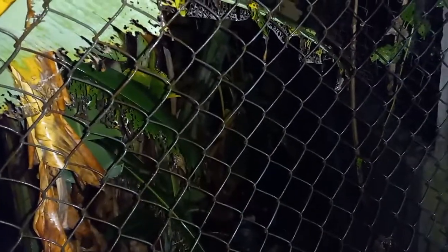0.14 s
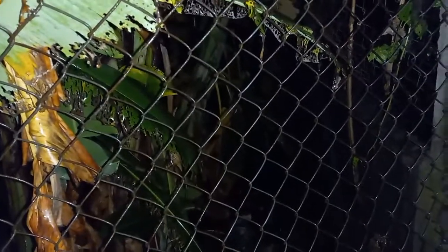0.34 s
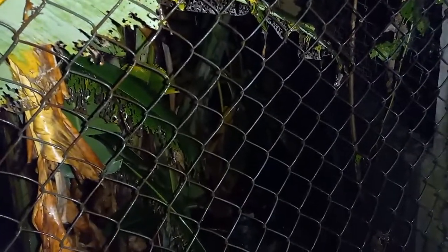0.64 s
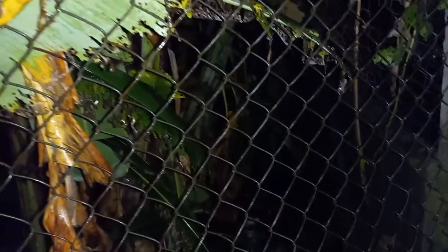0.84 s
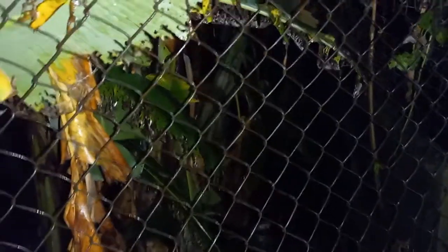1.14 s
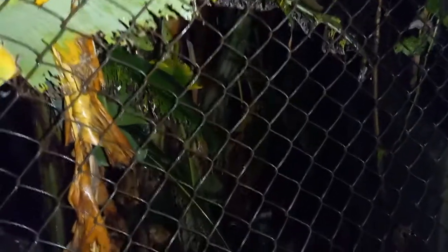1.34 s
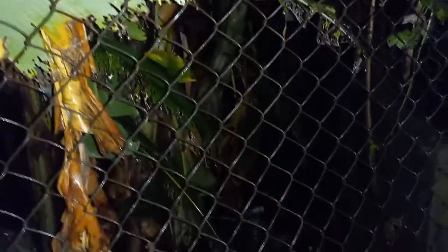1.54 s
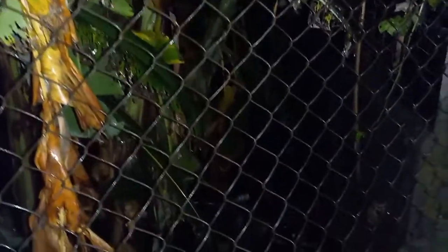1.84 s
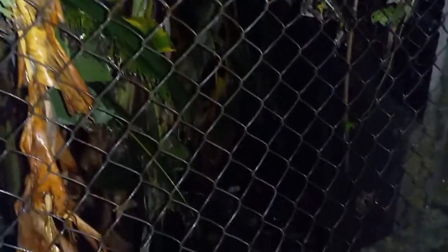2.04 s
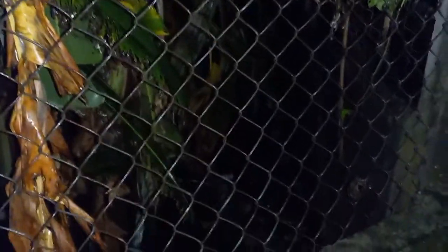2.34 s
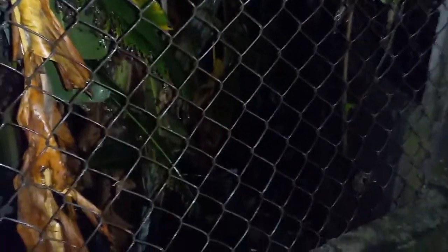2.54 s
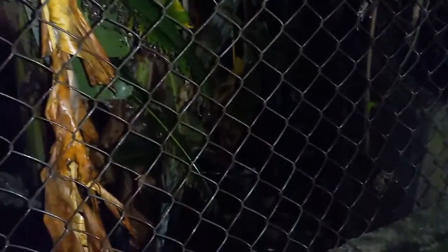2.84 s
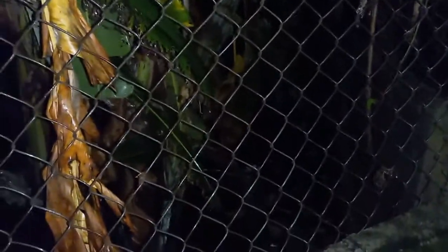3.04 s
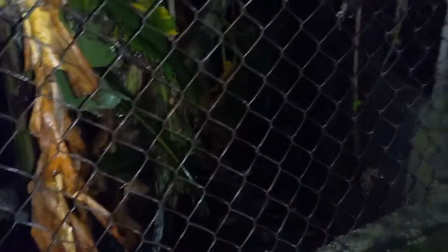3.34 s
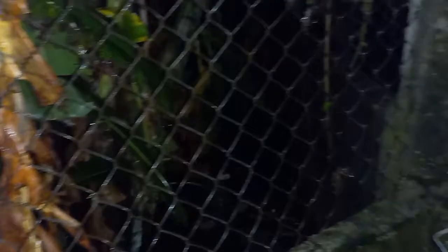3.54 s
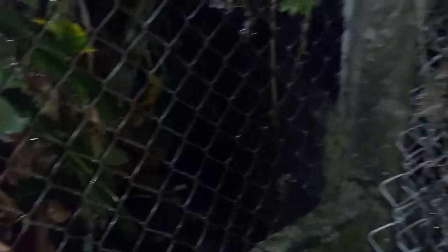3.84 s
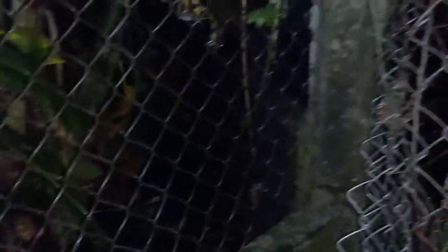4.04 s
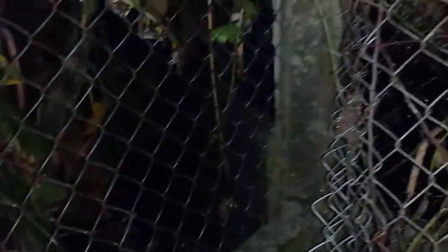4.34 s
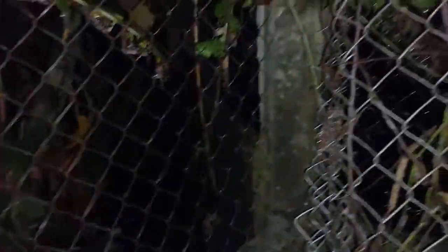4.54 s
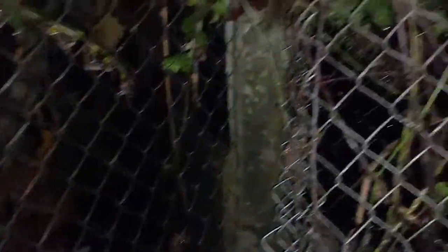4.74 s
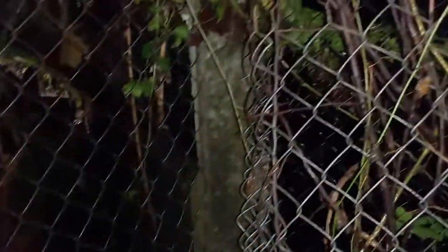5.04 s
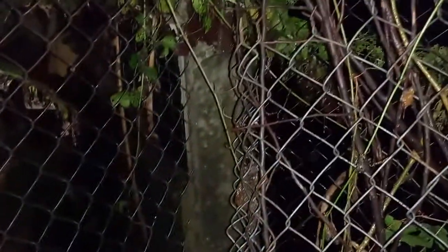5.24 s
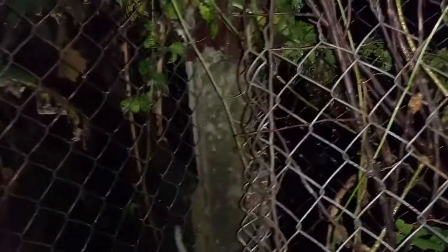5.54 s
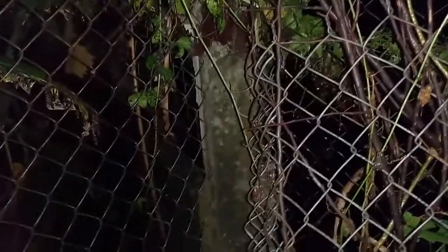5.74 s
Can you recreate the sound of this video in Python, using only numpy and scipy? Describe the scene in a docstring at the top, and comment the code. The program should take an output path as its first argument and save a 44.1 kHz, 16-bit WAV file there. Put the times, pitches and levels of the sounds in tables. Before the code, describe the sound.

Small frogs rattle, buzz and trill in a dense night chorus over shrill insects, with low hoots and one loud close moo.

```python
"""A wet garden at night, heard by a stereo pair of microphones among the leaves.
Small frogs rattle, buzz and trill in the undergrowth: uneven pulse trains ring throat and vocal sac.
One large frog moos close by in harmonics of one pitch; others hoot far off in wavering single tones.
Crickets, a katydid and an insect choir shrill above in shaped noise and pulses; single sharp ticks
stand out as damped rings, over a low distant rumble of coloured noise."""
import sys
import numpy as np
from scipy import signal
from scipy.fft import rfft, irfft
from scipy.io import wavfile

SR = 44100
rng = np.random.default_rng(int(sys.argv[2]) if len(sys.argv) > 2 else 0)


def transcribe(signal):
    """Save signal, clipped to [-1, 1], as a 16-bit WAV file at the path in sys.argv[1]."""
    frames = np.atleast_2d(signal).T
    limited = np.clip(frames, -1, 1)
    pcm = np.round(limited * 32767).astype(np.int16)
    wavfile.write(sys.argv[1], SR, pcm)


N = 259308
TIME = np.arange(N) / SR


def from_db(db):
    """Decibels to gain."""
    return 10 ** (np.asarray(db) / 20)


def rms_one(x):
    """Scale to unit power."""
    return x / np.sqrt(np.mean(x ** 2) + 1e-20)


def in_time(rows):
    """Each column of a curve at every sample."""
    s, *columns = np.transpose(rows)
    return [np.interp(TIME, s, c) for c in columns]


def at_hz(points):
    """A table over frequency at every spectral bin, joined along log frequency."""
    hz, value = np.transpose(points)
    return np.interp(np.log(np.fft.rfftfreq(N, 1 / SR) + 1), np.log(hz), value)


def coloured(x, spectrum):
    """Weight a sound by a spectrum of (frequency [Hz], level [dB]); unit power."""
    return rms_one(irfft(rfft(x) * from_db(at_hz(spectrum)), N))


def stereo_noise():
    """Unrelated white noise at the left and right microphones."""
    return rng.standard_normal((2, N))


def panned(db):
    """Left and right gains for a left-right level difference in dB."""
    return from_db(np.array([[.5], [-.5]]) * db)


def drift(rate):
    """Slow random wandering with a spread of 1, from 2 * rate random points per second."""
    knots = rng.standard_normal(int(2 * rate * N / SR) + 2)
    return rms_one(np.interp(TIME * 2 * rate, np.arange(len(knots)), knots))


# how alike the two microphones hear a wide source: (frequency [Hz], left-right correlation [-1 to 1])
MICROPHONE_LIKENESS = [(30, 0.53), (100, 0.76), (240, 0.73), (600, 0.21), (1300, -0.86), (2200, 0.17),
                       (3300, -0.034), (16000, 0.0053)]


def diffuse(pair):
    """Two unrelated signals become one wide sound field, alike in the bass."""
    mid, side = rfft(pair)
    alike = np.clip(at_hz(MICROPHONE_LIKENESS), -1, 1)
    return irfft(np.sqrt(1 + alike) * mid + np.sqrt(1 - alike) * side * [[1], [-1]], N)


def resonate(x, hz, width_hz):
    """A steep-sided resonance whose centre may glide: shift it to zero, smooth twice, shift back."""
    turn = np.exp(2j * np.pi * np.cumsum(hz * np.ones(x.shape[-1])) / SR)
    r = np.exp(-np.pi * width_hz / SR)
    smoothed = signal.lfilter([(1 - r) ** 2], [1, -2 * r, r * r], x / turn + 1e-18)
    return np.real(turn * smoothed)


def pulses(per_s, jitter, uneven_db, first_s=None):
    """A train of slightly uneven clicks, one of them at first_s if that is given."""
    cycles = np.cumsum(per_s * (1 + jitter * drift(15))) / SR
    cycles = cycles + (rng.random() if first_s is None else -np.interp(first_s, TIME, cycles))
    at = np.flatnonzero(np.diff(np.floor(cycles)))
    clicks = np.zeros(N)
    clicks[at] = from_db(uneven_db * rng.standard_normal(len(at)))
    return clicks


def bursts(clicks, t60):
    """Each click arrives as a short stereo puff of noise, smeared by the leaves."""
    decay = signal.lfilter([1], [1, -from_db(-60 / (t60 * SR))], clicks + 1e-18)
    return decay * rng.standard_normal((2, len(clicks)))


def swell(start, end, fullness, lateness=1):
    """One arch, broader with lower fullness; lateness above 1 moves its top towards the end."""
    progress = np.clip((TIME - start) / (end - start), 0, 1)
    return np.sin(np.pi * progress ** lateness).clip(0) ** fullness


def foliage(x, t60, wet_db):
    """The direct sound and a dying scatter from leaves and walls, different on each side."""
    t = np.arange(SR // 4) / SR
    scatter = rng.standard_normal((2, len(t))) * from_db(-60 * t / t60)
    scatter *= from_db(wet_db) / np.sqrt(np.sum(scatter ** 2, axis=1, keepdims=True))
    scatter[:, 0] += 1  # direct path
    return signal.oaconvolve(np.atleast_2d(x), scatter, axes=1)[:, :N] / np.hypot(1, from_db(wet_db))


# how hard the crowd calls, before its gains:
# (time [s], throat level [dB], vocal sac level [dB])
CROWD_EFFORT = [(0.0, -36.5, -33), (0.34, -38, -42.5), (0.65, -36, -35.5), (1.11, -37.5, -41),
                (1.46, -35.5, -39), (1.67, -36, -36), (2.41, -38.5, -39.5), (2.78, -35, -34.5),
                (2.88, -33, -39), (3.06, -35, -32.5), (3.98, -35.5, -40), (4.14, -34.5, -32.5),
                (4.57, -31.5, -33.5), (4.77, -35, -40), (5.24, -36, -34.5), (5.44, -39, -43.5),
                (5.55, -34.5, -35.5), (5.88, -32.5, -31.5)]
# where the crowd leans between the microphones: (time [s], left-right difference [dB])
CROWD_DIRECTION = [(0.0, -2.5), (3.78, 0), (5.5, -4.5)]
# the crowd's two resonance regions: (frequency [Hz], relative level [dB])
CROWD_THROAT = [(900, -54), (1100, -18.5), (1230, -4), (1370, 4), (1600, 0), (2050, -4), (2170, 0.5),
                (2330, -4), (2800, -7), (3300, -29)]
CROWD_SAC = [(2200, -22.5), (2650, -13), (2950, -3.5), (3250, 1.5), (3480, -2), (3700, -8), (3950, -14),
             (4400, -24.5), (5500, -34)]
CROWD_THROAT_GAIN_DB, CROWD_SAC_GAIN_DB = 2, 2.5


def frog_crowd(count=10):
    """Many pulse trains, each waxing and waning, blur into a grainy wash in two resonance regions."""
    throat_db, sac_db = in_time(CROWD_EFFORT)
    clicks = 0
    for slowest, fastest in [(33, 39), (100, 130)] * (count // 2):  # rattlers and buzzers, pulses per s
        train = pulses(rng.uniform(slowest, fastest), .01, 2.5)
        clicks = clicks + train * from_db(3.1 * drift(2.02))
    wash = diffuse(foliage(clicks - clicks.mean(), t60=0.15, wet_db=11.5))
    wash = rms_one(wash) + from_db(-1.5) * stereo_noise()
    throats = from_db(CROWD_THROAT_GAIN_DB + throat_db) * coloured(wash, CROWD_THROAT) * panned(-1.35)
    sacs = from_db(CROWD_SAC_GAIN_DB + sac_db) * coloured(wash, CROWD_SAC) * panned(5.3)
    return panned(in_time(CROWD_DIRECTION)[0]) * (throats + sacs)


# calls of the nearest rattler: (first click [s], end [s], click rate at the start [1/s],
# relative level [dB], left-right difference [dB])
KNOCK_CALLS = [(4.8545, 5.388, 37.2, -23.5, -2), (5.493, 5.7, 37, -28, -1)]
# its body resonances: (frequency [Hz], width [Hz], level at the start [dB],
# level gained as the sac fills [dB/s])
KNOCK_RESONANCES = [(1470, 190, -2.5, -19), (1690, 330, -2.5, -9), (2150, 330, -17, -8),
                    (2830, 360, -5, 14), (3440, 460, -4.5, 20.5), (7200, 2100, -18, 0)]
KNOCK_SLOWING_PER_S2 = 5.2


def knocking_frog():
    """The nearest rattler's clicks stand out sharply, with a short scatter from the leaves;
    they slow a little and brighten as its sac fills."""
    out = np.zeros((2, N))
    for start, end, per_s, db, pan_db in KNOCK_CALLS:
        on = (TIME > start - .5 / per_s) & (TIME < end)
        t = TIME[on] - start
        clicks = pulses(per_s - KNOCK_SLOWING_PER_S2 * (TIME - start), .002, 1.2, start)[on]
        clicks = clicks * swell(start - 2 / per_s, end, 0.45)[on] * from_db(db) * panned(pan_db)
        for hz, width_hz, level_db, gain_db_per_s in KNOCK_RESONANCES:
            unit_peak = np.e * SR / (np.pi * width_hz)  # gives each ring the height of its click
            struck = clicks * from_db(level_db + gain_db_per_s * t)
            out[:, on] += unit_peak * resonate(struck, hz, width_hz)
    return foliage(out, t60=.07, wet_db=-2)


# rattling frogs: (first pulse [s], end [s], pulse rate [1/s], sac resonance at mid-call [Hz],
# relative level [dB], left-right difference [dB])
RATTLE_CALLS = [(.01, 0.158, 42, 3160, -43, 6), (.304, .63, 35.2, 2920, -39.5, 2),
                (.613, 1.099, 35, 3300, -40, 3), (1.595, 2.051, 34, 3280, -38.5, 4),
                (2.049, 2.517, 35.95, 3340, -39.5, 1), (2.526, 2.93, 37.3, 3280, -38.5, 5),
                (3.347, 3.919, 38, 3260, -34, 1.5)]
RATTLE_CLIMB_HZ_PER_S = 350


def rattling_frogs():
    """Slow sharp pulses ring the throat and a sac whose pitch creeps up through the call."""
    puffs, sacs = np.zeros((2, 2, N))
    for start, end, per_s, hz, db, pan_db in RATTLE_CALLS:
        on = (TIME > start - .5 / per_s) & (TIME < end)
        drive = bursts(pulses(per_s, 0.004, .7, start)[on], t60=0.015)
        gain = swell(start - 1 / per_s, end, 0.3)[on] * from_db(db) * panned(pan_db)
        sac_hz = hz + RATTLE_CLIMB_HZ_PER_S * (TIME[on] - (start + end) / 2)
        puffs[:, on] += gain * rms_one(drive)
        sacs[:, on] += gain * rms_one(resonate(drive, sac_hz, 660))
    throat_colour = [(900, -33), (1150, -10), (1400, 7.5), (1800, -3.0), (2100, 6.0), (2500, 1.5),
                     (3700, -5.5), (4300, -39), (5600, -30), (8000, -24), (14000, -28)]
    throats = np.std(puffs) * coloured(puffs, throat_colour)
    return foliage(from_db(-1) * sacs + from_db(-3) * throats, t60=0.11, wet_db=0)


# rising buzzes: (start [s], end [s], first sac resonance [Hz], last sac resonance [Hz],
# relative level [dB], first pulse rate [1/s], last pulse rate [1/s], throat resonance at mid-call [Hz],
# throat level against the sac [dB], lateness of the top [exponent], left-right difference [dB])
BUZZ_CALLS = [(1.371, 1.769, 3460, 3970, -33.5, 127.5, 114.4, 1990, 0, 1, -3),
              (2.551, 3.082, 3050, 3560, -34.5, 140.2, 126.3, 1720, -3, 1.3, 2),
              (3.03, 3.413, 3300, 3610, -33, 129.6, 120.3, 1764, -3, 1.03, 0.5),
              (3.97, 4.27, 3000, 3330, -35, 131.3, 118.7, 1590, -9, 2.5, 1),
              (4.129, 4.601, 3160, 3760, -25, 143.4, 112.2, 1805, -9, 1.14, 2.5),
              (4.42, 4.85, 3470, 3940, -27, 123, 114.5, 1880, -10, 0.6, 1.5),
              (5.47, 6.101, 3240, 3680, -29.5, 124, 131.8, 1646, -6.5, 1.2, 1.5)]
BUZZ_SAG_HZ_PER_S = 130
BUZZ_SAC_WIDTH_HZ, BUZZ_THROAT_WIDTH_HZ = 410, 215
BUZZ_FULLNESS, BUZZ_HOARSE_DB = 0.87, -6


def buzzing_frogs():
    """Fast pulses ring a sac whose pitch climbs ever more slowly as it fills, and a sinking throat."""
    out = np.zeros((2, N))
    quarter_cycle_apart = np.array([[1], [1j]])  # left and right microphones
    for (start, end, first_hz, last_hz, db, first_per_s, last_per_s,
         throat_hz, throat_db, lateness, pan_db) in BUZZ_CALLS:
        on = (TIME > start) & (TIME < end)
        t = TIME[on] - start
        sac_hz = first_hz + (last_hz - first_hz) * np.sin(np.pi / 2 * t / (end - start))
        sinking_hz = throat_hz - BUZZ_SAG_HZ_PER_S * (t - (end - start) / 2)
        clicks = pulses(np.interp(TIME, [start, end], [first_per_s, last_per_s]), .012, .7)[on]
        hoarse = rms_one(bursts(clicks, t60=0.04))
        drive = rms_one(clicks) * quarter_cycle_apart + from_db(BUZZ_HOARSE_DB) * hoarse
        sac = rms_one(resonate(drive, sac_hz, BUZZ_SAC_WIDTH_HZ))
        throat = rms_one(resonate(drive, sinking_hz, BUZZ_THROAT_WIDTH_HZ))
        voice = sac + from_db(throat_db) * throat
        out[:, on] += voice * swell(start, end, BUZZ_FULLNESS, lateness)[on] * from_db(db) * panned(pan_db)
    low_cut = signal.butter(6, 1250, "high", fs=SR, output="sos")
    return foliage(signal.sosfilt(low_cut, out), t60=.07, wet_db=-6)


# whistled trills: (first puff [s], end [s], puff rate [1/s], relative level [dB],
# left-right difference [dB])
TRILL_CALLS = [(0.409, 0.782, 32, -38.5, 6.5), (1.135, 1.46, 41, -40, 6), (1.858, 2.176, 42, -34.5, 4.5),
               (2.924, 3.27, 36.65, -30.5, 3.5), (3.647, 3.927, 37.6, -36, 4),
               (4.458, 4.73, 37.05, -40.5, 5), (5.12, 5.42, 46, -40, 0)]
TRILL_HZ, TRILL_RISE_S, TRILL_HALO_DB = 2822, .007, -3.5


def trills():
    """A narrow whistle in quick puffs, each rising fast and dying before the next, with a halo of scatter."""
    phase = 2 * np.pi * np.cumsum(TRILL_HZ + 10 * drift(20)) / SR
    whistle = np.sqrt(2) * np.sin(phase + np.array([[np.pi / 2], [0]]))  # left leads by a quarter cycle
    halo = rms_one(resonate(stereo_noise(), TRILL_HZ, 300))
    whistle = whistle + from_db(TRILL_HALO_DB) * halo
    gain = 0
    for start, end, per_s, db, pan_db in TRILL_CALLS:
        age = (TIME - start) % (1 / per_s) / TRILL_RISE_S
        puffs = rms_one(age * np.exp(-age))
        gain = gain + puffs * swell(start - 1 / per_s, end, 1.04) * from_db(db) * panned(pan_db)
    return foliage(gain * whistle, t60=.06, wet_db=-8)


# effort of the large frog close by, before fades and waver:
# (time [s], main tone level [dB], overtone level [dB])
MOO_EFFORT = [(4.24, -63, -51), (4.272, -50, -57), (4.32, -42, -41.5), (4.416, -24.5, -31.5),
              (4.462, -22, -30.5), (4.542, -23.5, -29.5), (4.694, -30.5, -33.5), (4.785, -39, -43.5),
              (4.83, -55, -55), (4.844, -53, -71), (4.9, -71, -63)]
# its vocal sac: (harmonic [number], relative level [dB], left-right difference [dB],
# phase by which the left microphone leads [rad])
MOO_HARMONICS = [(2, 0, 0.5, 0.22), (3, -7, -1, 0.44), (4, -5.5, -6.5, 0.5), (5, -4, 5.5, 0.5),
                 (6, -8.5, -11.5, 0.92), (7, -12, 14, 2), (8, -1, -11, 1.3), (9, 2, -9, 2.4),
                 (10, -16, 9, 2.8), (11, -1.5, -5, 3.3), (12, -12, 9, 1.5)]
MOO_HZ, MOO_EDGE_S = 150.4, 0.059  # mean pitch; fade at both ends
MOO_SPREAD_RAD, MOO_WAVER_DB = .45, 1.7
MOO_NARROWING_DB = 0.04  # per harmonic and dB below full effort: high overtones come last and go first


def mooing_frog():
    """Steady folds drive the sac almost in step; overtones hold as the main tone sags, and cycles rasp."""
    from_either_end = np.minimum(TIME - MOO_EFFORT[0][0], MOO_EFFORT[-1][0] - TIME)
    edge = from_either_end.clip(0, MOO_EDGE_S) / MOO_EDGE_S
    main_db, overtones_db = in_time(MOO_EFFORT)
    main, overtones = edge * from_db(main_db), edge * from_db(overtones_db)
    slack_db = overtones_db.max() - overtones_db
    phase = 2 * np.pi * np.cumsum(MOO_HZ * (1 + 0.0014 * drift(18))) / SR
    voice = 0
    for k, db, pan_db, lead in MOO_HARMONICS:
        harmonic = round(k)
        level = main
        if harmonic > 2:
            level = overtones * from_db(MOO_WAVER_DB * drift(22) - MOO_NARROWING_DB * k * slack_db)
        offset = MOO_SPREAD_RAD * rng.standard_normal() + lead * np.array([[.5], [-.5]])
        voice = voice + from_db(db) * level * panned(pan_db) * np.cos(harmonic * phase + offset)
    gate = (1 + np.cos(phase)) ** 2  # opens once a cycle
    rasp = coloured(stereo_noise() * gate, [
        (1000, -11), (1500, 2), (1800, -2), (2400, -7), (4500, -29), (5600, -14.5), (8500, -23),
        (11000, -33), (16000, -32)])
    flutter = coloured(diffuse(stereo_noise()), [
        (30, -13), (110, -0.5), (350, -3), (650, -8), (1000, -12), (2000, -33)])
    return np.sqrt(2) * voice + overtones * (from_db(-4.5) * rasp + from_db(-8) * flutter)


# notes of the far large frogs: (start [s], end [s], pitch at the middle before waver [Hz],
# level before waver [dB], left-right difference [dB])
HOOT_NOTES = [(-.04, 0.024, 243, -25, -3), (0.018, 0.11, 232, -34.5, 5), (0.066, 0.325, 239.5, -27, -1.5),
              (2.04, 2.26, 267, -54, -3), (2.175, 2.354, 263.8, -42.5, -10), (2.328, 2.82, 246.3, -52, -1),
              (2.767, 2.867, 238, -41, -3), (2.834, 2.908, 238, -30, -3), (2.884, 3.16, 239, -24, -2),
              (3.144, 3.191, 235, -25, -2.5), (3.19, 3.259, 236, -24, 1.5), (3.264, 3.422, 241, -28, -2),
              (3.39, 3.496, 241, -33.5, -3), (5.608, 5.807, 224.6, -36, -5),
              (5.76, 5.837, 225, -34.5, -7.5)]
HOOT_FULLNESS, HOOT_WAVER_HZ, HOOT_WAVER_DB = 0.79, 2.27, 2
HOOT_DROOP_HZ = 6  # at both ends of a note


def hooting_frogs():
    """Distance leaves only the sac's main tone, an arch a note, over the drone of the farthest frogs."""
    notes = 0
    waver = HOOT_WAVER_HZ * drift(12)
    for start, end, hz, db, pan_db in HOOT_NOTES:
        droop = HOOT_DROOP_HZ * (1 - swell(start, end, 0.99))
        tone = np.sqrt(2) * np.sin(2 * np.pi * np.cumsum(hz + waver - droop) / SR)
        notes = notes + tone * swell(start, end, HOOT_FULLNESS) * from_db(db) * panned(pan_db)
    hoarse = coloured(rng.standard_normal(N), [(20, 8), (100, 5.5), (300, -23), (600, -28), (1500, -46)])
    unsteady = from_db(HOOT_WAVER_DB * drift(16)) + from_db(-19.0) * hoarse
    farthest = rms_one(resonate(diffuse(stereo_noise()), 239.7, 10.2))
    return notes * unsteady + from_db(-55.0) * farthest


# a far group on one shared note: (time [s], pitch before waver [Hz], level before waver [dB])
FAR_GROUP_NOTE = [(0, 2080, -47), (1.2, 2120, -54.5), (2.4, 2130, -46), (3.1, 2150, -42.5),
                  (4.4, 2156, -45.5), (5.88, 2070, -45)]
PEEP_DB, PEEP_S, PEEP_WIDTH_HZ = -44.5, .32, 130  # single calls out of the crowd
PEEP_GLIDE_HZ_PER_S = 360  # steepest, up or down


def far_frogs(count=30):
    """A group holds a wavering note; single frogs trill out at random times, pitches and rates."""
    hz, db = in_time(FAR_GROUP_NOTE)
    group = rms_one(resonate(stereo_noise(), hz + 25 * drift(4), 170))
    out = from_db(db + 2 * drift(6)) * group
    t = np.arange(int(PEEP_S * SR)) / SR
    for when, pitch, glide, side, rate in rng.random((count, 5)):
        peep_hz = 1350 * (3500 / 1350) ** pitch + PEEP_GLIDE_HZ_PER_S * (2 * glide - 1) * t
        clicks = np.diff(np.floor((33 + 7 * rate) * t), prepend=0)
        turned = clicks * np.exp(2j * np.pi * side * np.array([[0], [1]]))  # phase between microphones
        peep = rms_one(resonate(turned, peep_hz, PEEP_WIDTH_HZ))
        at = int(when * (N - len(t)))
        arch = np.sin(np.pi * t / PEEP_S)
        out[:, at:at + len(t)] += from_db(PEEP_DB) * arch * peep * panned(6 * (2 * side - 1))
    return out


# crickets: (mean chirp rate [1/s], first chirp before wandering [s], top pitch [Hz], bottom pitch [Hz],
# level [dB])
CRICKET_VOICES = [(8.9, 0.02, 7770, 6450, -48.5), (7.7, 0.056, 7110, 6820, -48),
                  (12, 0.016, 14000, 6650, -60)]
CRICKET_UNSTEADINESS = .2  # of a chirp cycle


def crickets():
    """Each wing stroke slows as it closes, so every chirp slides downward; the beat is loose."""
    out = 0
    for per_s, first_s, top_hz, bottom_hz, db in CRICKET_VOICES:
        stroke = ((TIME - first_s) * per_s + CRICKET_UNSTEADINESS * drift(3)) % 1
        chirp = resonate(stereo_noise(), top_hz + (bottom_hz - top_hz) * stroke, 350)
        out = out + from_db(db) * rms_one(chirp * np.sin(np.pi * stroke) ** 0.26)
    return out


# the blurred insect choir, before gain and flicker: (time [s], level [dB])
CHOIR_LEVEL = [(0.0, -41.5), (0.26, -42.5), (2.46, -44.5), (3.01, -41.5), (4.08, -44.5), (4.49, -37.5),
               (4.85, -43.5), (5.88, -41.5)]
# its spectrum: (frequency [Hz], relative level [dB])
CHOIR_SPECTRUM = [(3000, -11.5), (4200, -4), (5000, -5.5), (5750, -12.5), (6200, -2), (6950, 1), (7500, -1),
                  (8000, -4), (8600, -1.5), (9300, -10), (10500, -10.5), (12500, -22), (15500, -32)]
CHOIR_GAIN_DB = 1


def insect_choir():
    """Too many insects to tell apart: coloured noise with a fast flicker and a slight slower sway."""
    flicker_db = 1.47 * drift(40) + 0.12 * drift(5.9)
    level = from_db(CHOIR_GAIN_DB + in_time(CHOIR_LEVEL)[0] + flicker_db)
    return coloured(stereo_noise(), CHOIR_SPECTRUM) * level


def katydid():
    """A fine buzz: nearly regular wing clicks, scattered by leaves and ringing in high bands."""
    wing = foliage(pulses(174.5, .0015, 1.0), t60=.02, wet_db=8)
    colour = [(8000, -50), (9400, -10), (10000, 7), (10600, 0), (11300, 7), (11800, -21),
              (12500, -7), (13800, -13), (15000, -25)]
    return from_db(-56.5) * coloured(wing, colour)


CHIRP_FIRST_S, CHIRP_EVERY_S, CHIRP_LENGTH_S = 0.0, 0.141, 0.17  # first peak, spacing, length
CHIRP_DB, CHIRP_FADE_DB = -39, 0.8  # first chirp, loss from each to the next


def bush_cricket(count=7):
    """A run of evenly spaced, fading rasps: noise in a narrow region under overlapping arches."""
    gain = 0
    for k in range(count):
        peak = CHIRP_FIRST_S + CHIRP_EVERY_S * k
        arch = swell(peak - CHIRP_LENGTH_S / 2, peak + CHIRP_LENGTH_S / 2, 1.3)
        gain = gain + from_db(CHIRP_DB - CHIRP_FADE_DB * k) * arch
    colour = [(4000, -25), (4750, -4), (5000, -2), (5200, -5), (5400, -2), (5750, -24), (6500, -43)]
    return gain * coloured(stereo_noise(), colour)


# single sharp ticks, some of them strong pulses of the rattling and buzzing frogs:
# (time [s], level before filtering and scatter [dB], ring frequency [Hz])
TICKS = [(0.6691, -15.5, 3200), (0.893, -20, 3290), (1.53, -21, 1840), (1.677, -18, 3300),
         (1.7017, -21, 2030), (2.3552, -16.5, 3200), (2.825, -27, 3300), (4.2847, -14, 3460),
         (5.7736, -19, 3280)]


def ticks():
    """Each single sharp tick is one short damped ring with a little band-limited noise."""
    out, t = np.zeros(N), np.arange(SR // 20) / SR
    band = signal.butter(2, [1200, 4500], "band", fs=SR, output="sos")
    for s, db, hz in TICKS:
        ring = np.sin(2 * np.pi * hz * t)
        tick = ring + 0.4 * signal.sosfilt(band, rng.standard_normal(len(t)))
        out[int(s * SR):][:len(t)] += from_db(db) * tick * from_db(-60 * t / 0.008)
    return foliage(signal.sosfilt(band, out), t60=.05, wet_db=-8)


# the distant rumble, before gain: (time [s], level [dB])
RUMBLE_LEVEL = [(0.0, -47.5), (0.46, -53.5), (2.26, -49.5), (2.52, -52.5), (2.85, -47), (4.32, -51.5),
                (4.44, -48.5), (5.6, -52.5), (5.88, -45)]
# its spectrum: (frequency [Hz], relative level [dB])
AIR_SPECTRUM = [(15, -52), (25, -43), (40, -10.5), (86, 0.5), (183, -13.5), (227, -3), (245, -10),
                (273, -11), (309, -25.5), (477, -18.5), (781, -18), (857, -24.5), (1000, -24.5),
                (1300, -15), (2200, -70)]
AIR_GAIN_DB = 2.5


def night_air():
    """A low, distant rumble: wide coloured noise of changing level."""
    rumble = coloured(diffuse(stereo_noise()), AIR_SPECTRUM)
    return from_db(AIR_GAIN_DB + in_time(RUMBLE_LEVEL)[0]) * rumble


def scene():
    """Frogs near and far, insects, ticks and air."""
    small_frogs = frog_crowd() + knocking_frog() + rattling_frogs() + buzzing_frogs() + trills()
    large_frogs = mooing_frog() + hooting_frogs()
    insects = crickets() + insect_choir() + katydid() + bush_cricket()
    return small_frogs + large_frogs + far_frogs() + insects + ticks() + night_air()


def record(dry):
    """The top is cut steeply above 15620 Hz."""
    top_cut = signal.ellip(12, .1, 80, 15620, fs=SR, output="sos")
    return signal.sosfilt(top_cut, dry)


dry = scene()
out = record(dry)
transcribe(out)
```